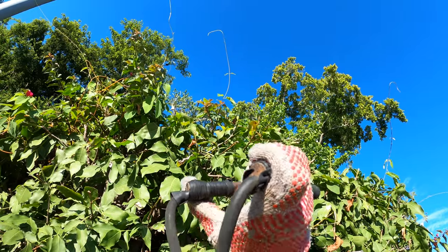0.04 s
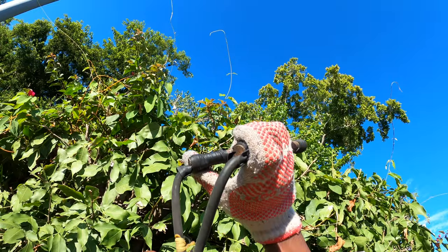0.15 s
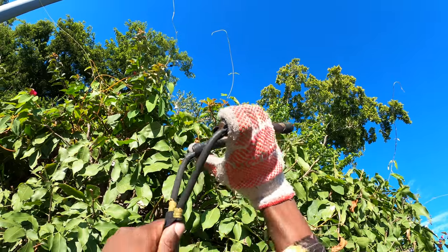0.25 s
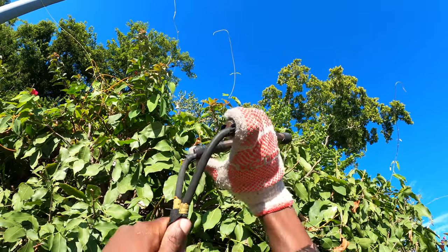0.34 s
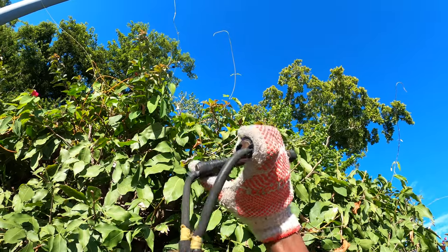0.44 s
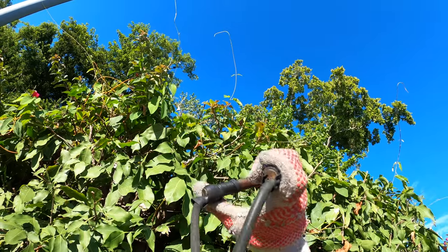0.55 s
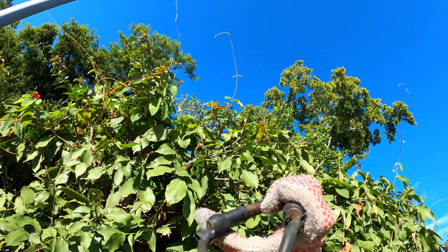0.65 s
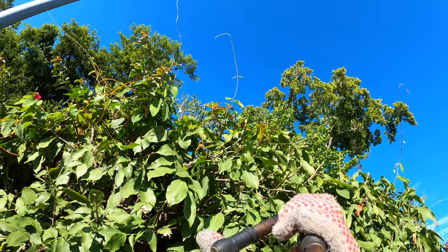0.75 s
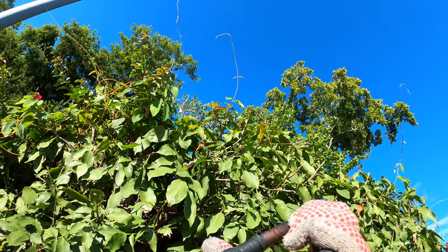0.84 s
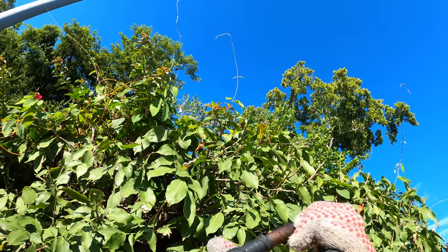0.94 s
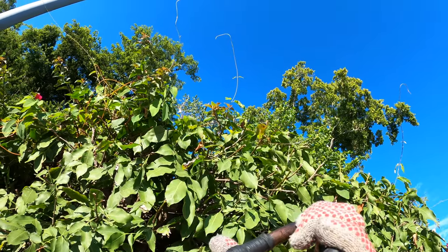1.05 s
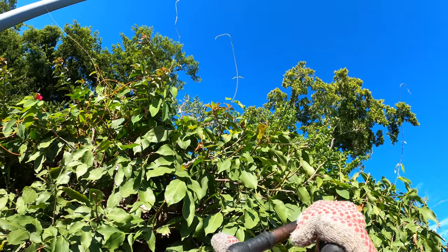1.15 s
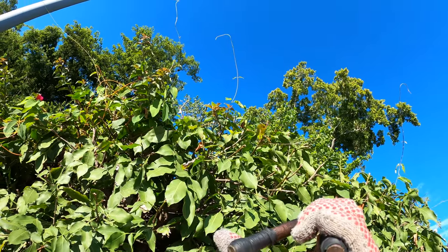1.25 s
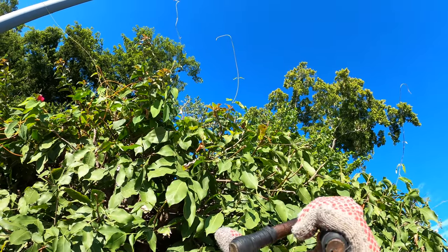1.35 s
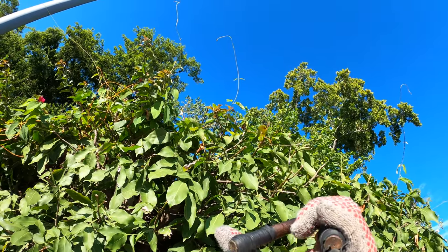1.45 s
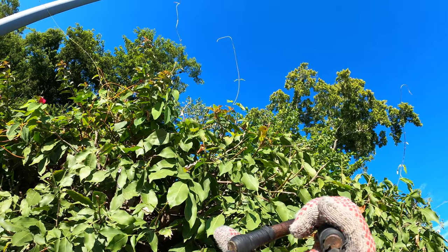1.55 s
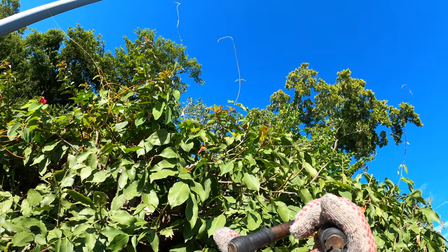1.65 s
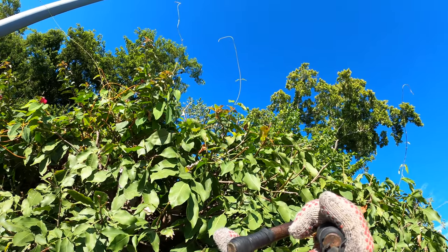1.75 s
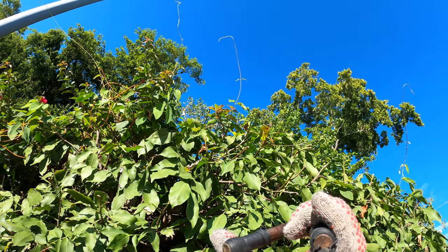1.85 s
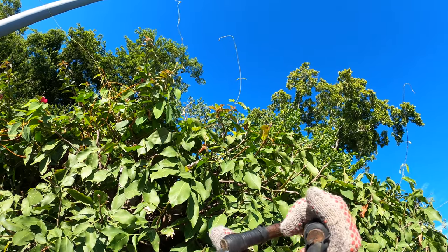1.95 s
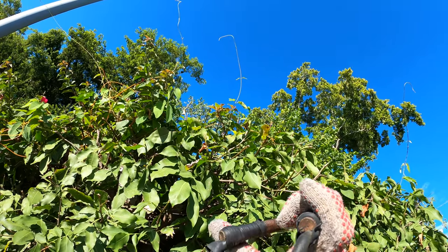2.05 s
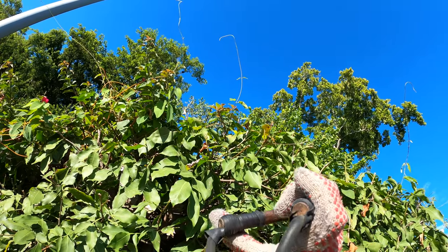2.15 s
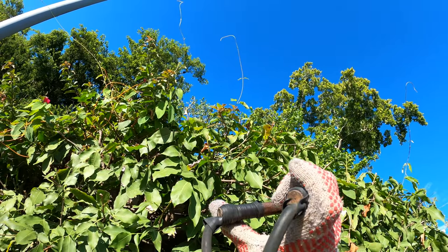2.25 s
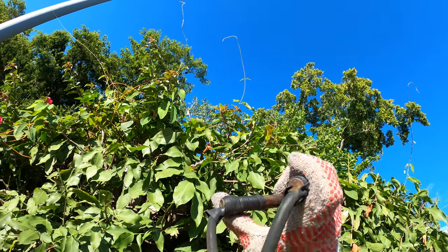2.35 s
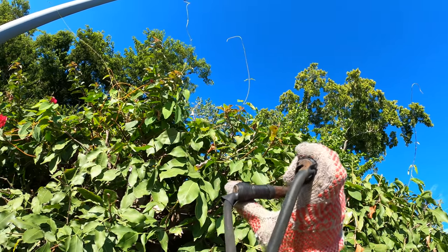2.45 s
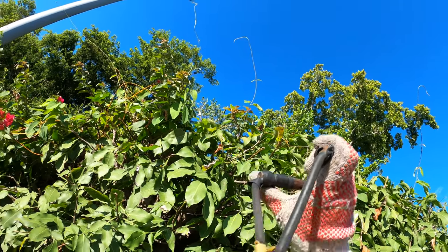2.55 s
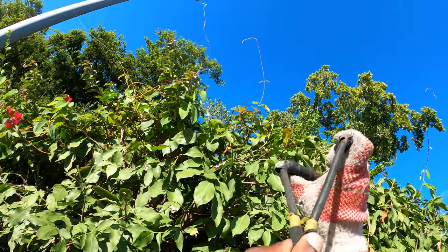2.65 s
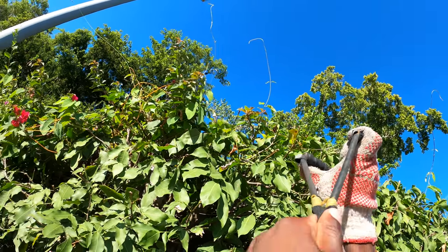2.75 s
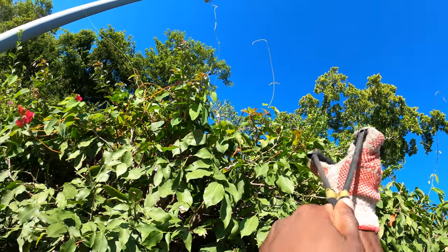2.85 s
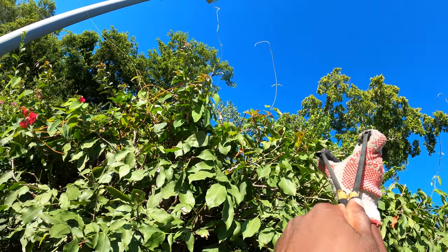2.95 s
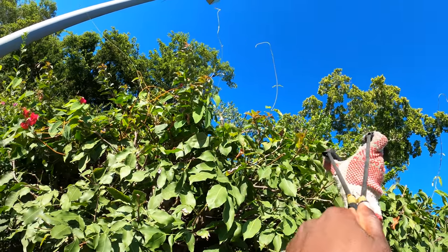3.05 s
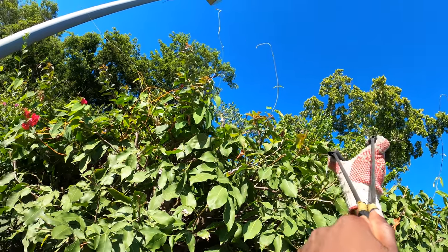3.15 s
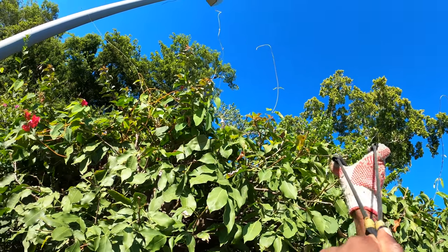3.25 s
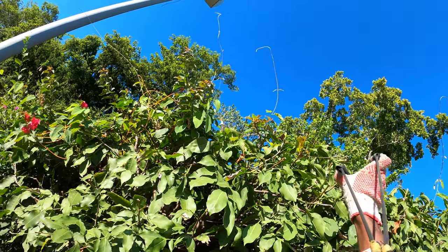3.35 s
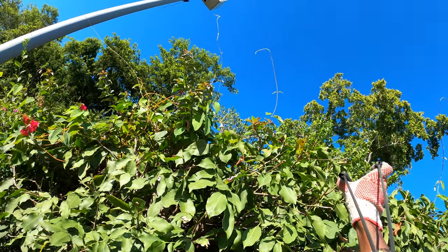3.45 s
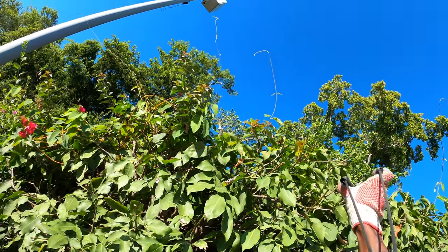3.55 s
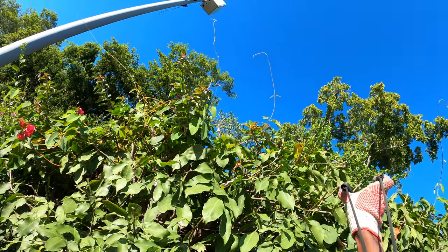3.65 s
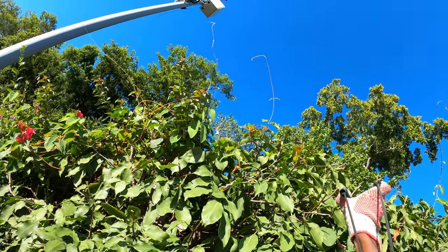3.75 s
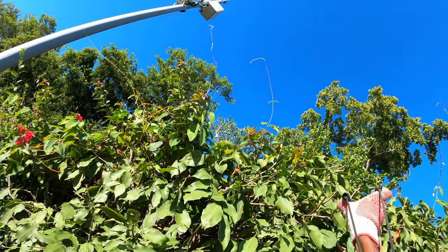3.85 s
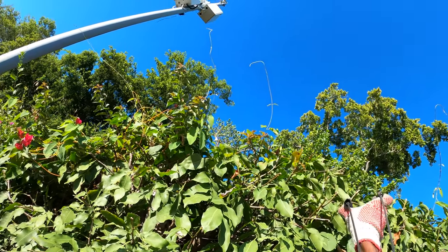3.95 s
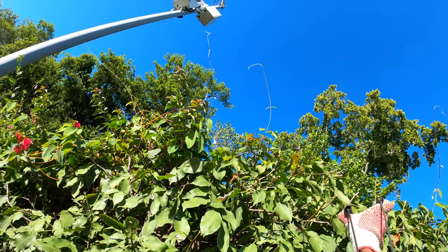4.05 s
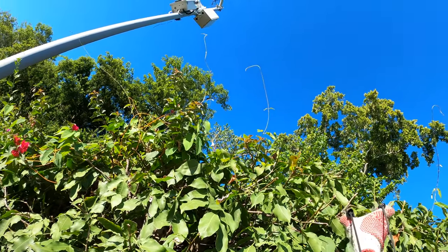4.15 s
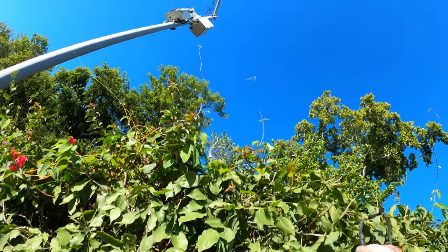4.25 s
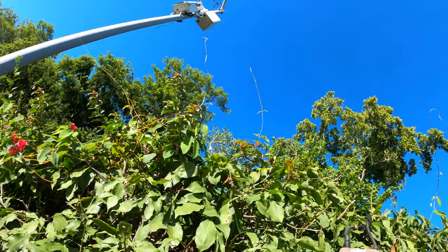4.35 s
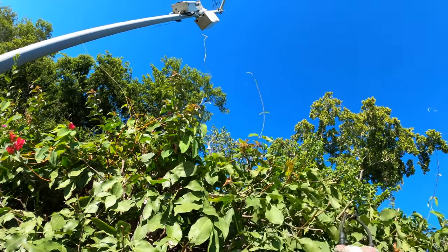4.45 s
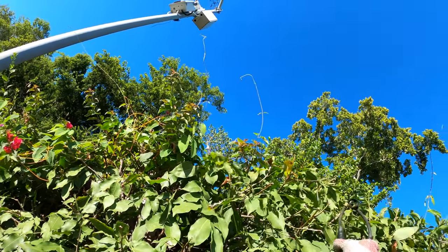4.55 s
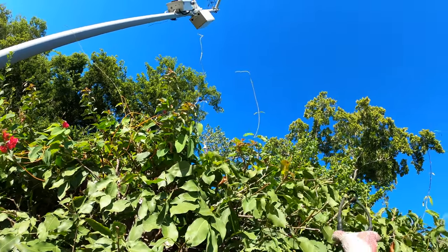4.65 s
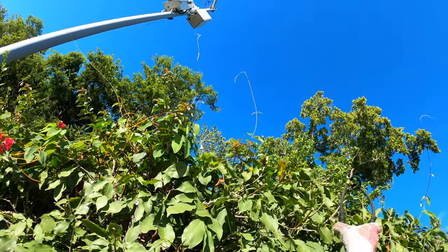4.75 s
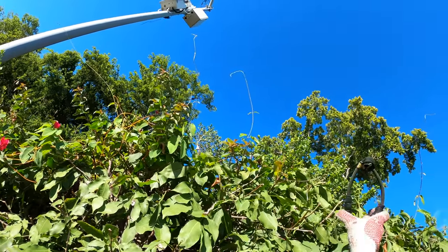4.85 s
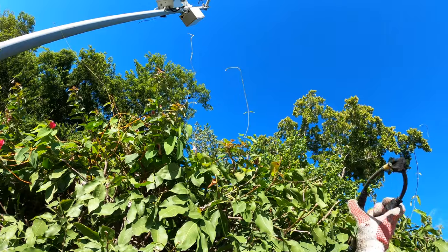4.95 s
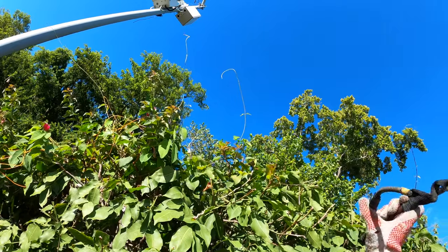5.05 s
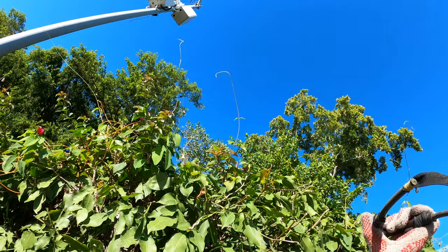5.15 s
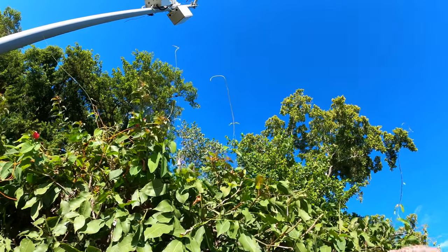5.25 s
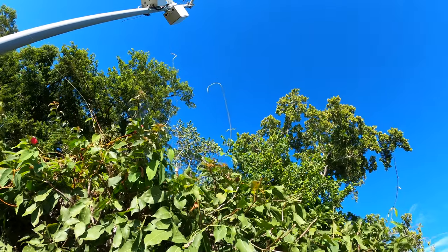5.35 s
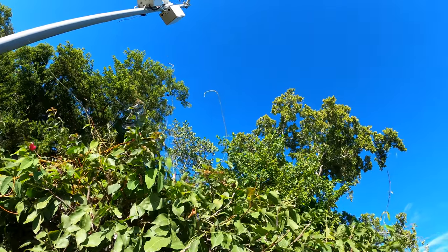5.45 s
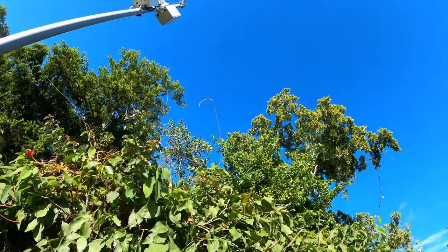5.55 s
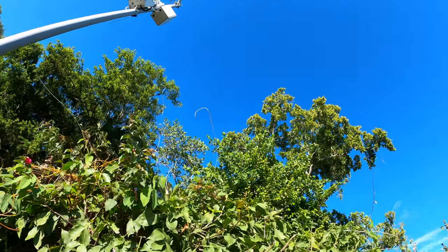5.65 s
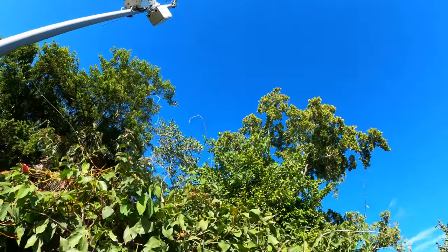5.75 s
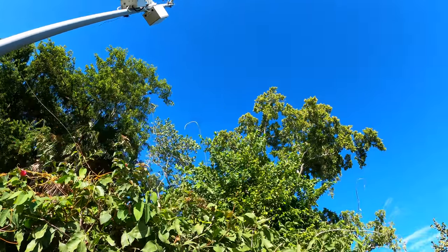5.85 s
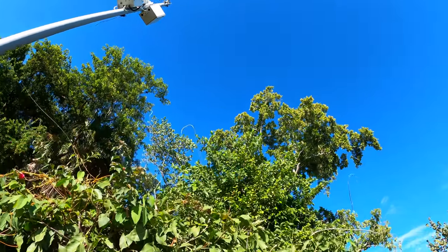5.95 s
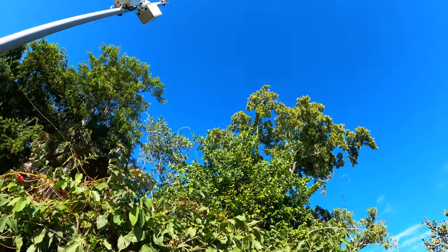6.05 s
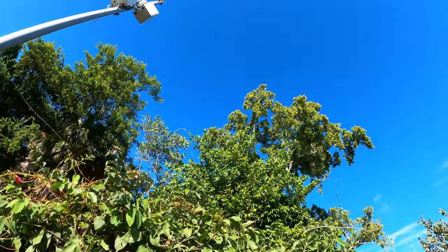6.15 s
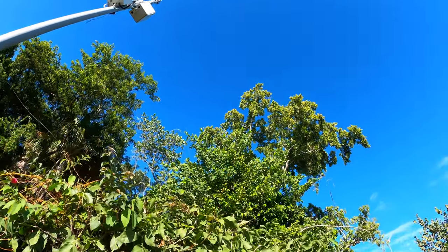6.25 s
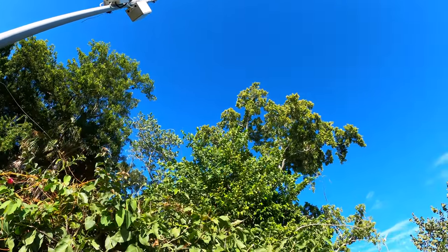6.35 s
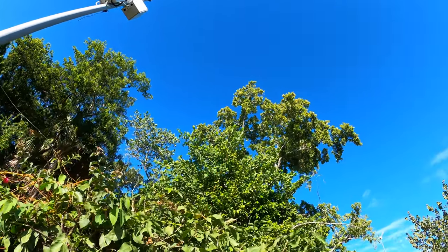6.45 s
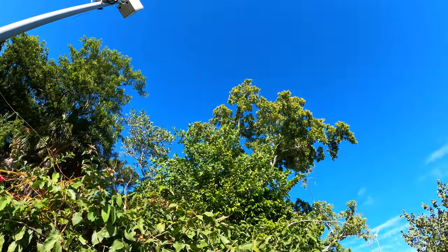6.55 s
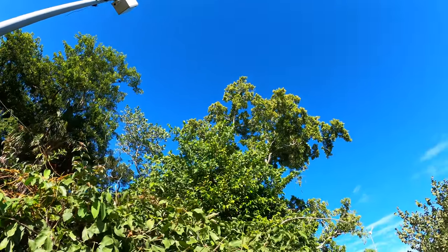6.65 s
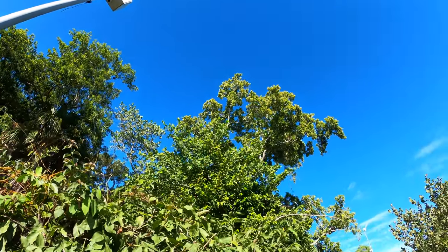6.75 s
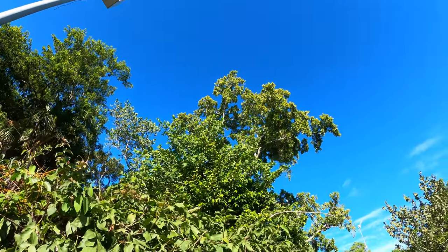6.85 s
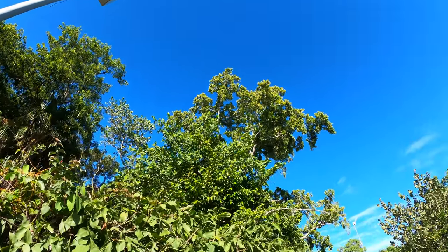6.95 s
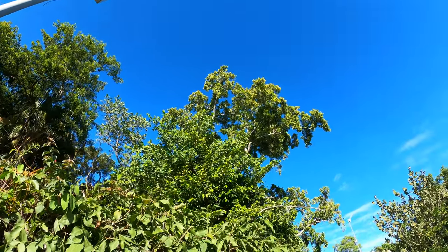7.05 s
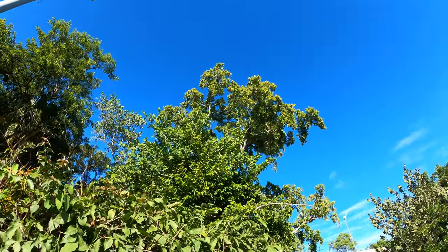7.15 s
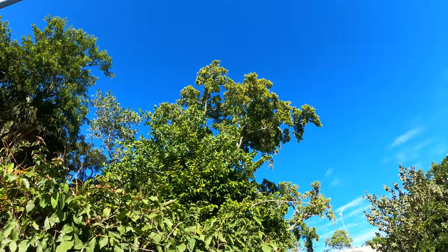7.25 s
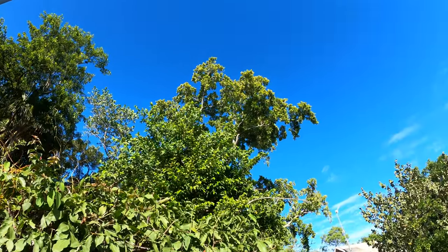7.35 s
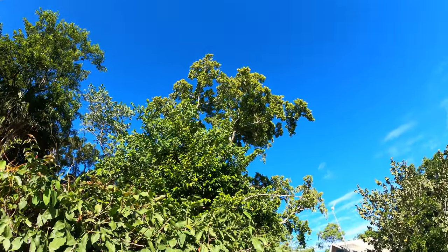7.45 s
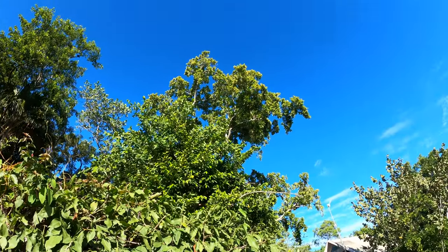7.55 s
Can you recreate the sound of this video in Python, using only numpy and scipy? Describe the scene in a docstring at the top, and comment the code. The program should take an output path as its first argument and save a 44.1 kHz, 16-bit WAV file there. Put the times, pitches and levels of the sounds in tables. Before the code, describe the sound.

A quiet, airy garden with faint bird warbles and soft dove coos. A glove rustles close by, then stretched rubber creaks in quick dry clicks that rise in pitch. After a short hold, the slingshot fires with a swish, a very loud sharp slap and a low jolt of the body-mounted microphone. Ticks and crisp leafy rustles follow, then a near reedy bird and a short hollow wind whistle.

```python
"""Slingshot in a garden

A gloved hand close to the camera draws and fires a rubber slingshot: grainy noise makes the cloth
rustle, clicks that ring make the bands creak slip by slip, noise puffs slap the fork and damped sines jolt
the camera. Birds and doves, trembling sines, call from the trees; noise through cavity resonances makes
the wind, whose gust whistles over the microphone ports near the end."""
import sys
import numpy as np
from scipy import signal
from scipy.fft import next_fast_len
from scipy.io import wavfile
from scipy.ndimage import uniform_filter1d

SR = 44100
rng = np.random.default_rng(int(sys.argv[2]) if len(sys.argv) > 2 else 0)


def unload_audio(sound):
    """Save the sound as a 16-bit wav file, at the path given as the first command line argument."""
    columns = np.transpose(np.atleast_2d(sound))
    # keep every value between -1 and 1, then stretch to whole-number steps
    steps = np.round(np.clip(columns, -1, 1) * 32767)
    wavfile.write(sys.argv[1], SR, steps.astype(np.int16))


N = 335292  # length in samples

# Garden air, spectrum before scaling: f/Hz, density level/dB per Hz
AIR_SPECTRUM = [(15, -27.5), (25, -17), (102, -1), (185, 3.5), (326, -4), (489, -10.5), (887, -21),
                (1230, -12), (1890, -26.5), (6380, -41), (9320, -39), (11000, -58.5), (16000, -62.5)]
# Likeness of the left and right ports in diffuse noise: f/Hz, likeness [0-1]
PORT_LIKENESS = [(60, 0.97), (180, 0.98), (550, 0.98), (1650, 1), (4970, 0.93), (15000, 0.25)]
# Cloth noise, spectrum before its dull and bright parts are split: f/Hz, density level/dB per Hz
CLOTH_SPECTRUM = [(290, -32.5), (500, -1), (621, -4), (1670, 1), (2290, -2), (2890, -0.5), (4090, -1.5),
                  (7000, -6), (10700, -24), (14900, -35.5), (16000, -34.5)]
# Fixed cavity modes of the microphone ports: f/Hz, width of each of two passes/Hz, relative level/dB
PORT_MODES = [(390, 90, 0), (1100, 500, -14), (290, 80, -4), (170, 100, -6)]
# Wind on the ports: t/s, push level/dB, cavity mode level/dB, upper whistle level/dB
WIND_LEVELS = [(0, -76, -90, -99), (.12, -71, -71.5, -70), (.33, -63, -59, -80), (.5, -72, -71, -78),
               (1.4, -68, -71, -73), (2.1, -76, -68, -76), (2.5, -69, -71.5, -77), (3.85, -69, -76, -88),
               (4.25, -54, -77, -88), (4.8, -72, -80, -88), (5.2, -64, -82, -89), (5.5, -70, -83, -89),
               (5.65, -64, -56.5, -66), (5.9, -60, -60, -74), (6.07, -68, -63, -72), (6.2, -65, -55, -59),
               (6.33, -62, -53, -55), (6.48, -67, -53, -50.5), (6.53, -60, -45.5, -42),
               (6.66, -50, -44, -34), (6.695, -53, -45, -55), (6.73, -58, -68, -76), (6.85, -67, -80, -95),
               (7.6, -85, -68.5, -84)]
# Strokes of glove, cloth and leaves, and the rasp at the start of the near bird's calls: peak t/s, hold/s,
# rise/s per 20 dB, fall/s per 20 dB, level/dB, dull part over it/dB, left minus right/dB
RUSTLE_STROKES = [(.12, .1, .2, .2, -69, 18, 0), (.21, .07, .16, .3, -59.5, 7, 0),
                  (.34, .05, .1, .04, -67, 11, 0), (1.42, .01, .15, .25, -75, 18, 0),
                  (2.4, .01, .2, .2, -77, 12, -2), (2.82, .1, .22, .55, -62, 9, 2),
                  (3.3, .4, .6, .5, -65, -2, 5), (4.03, .22, .07, .3, -61, 1.5, 5),
                  (4.2, .08, .15, .1, -66, 13, 4), (4.54, .02, .3, .4, -52, -5, 1),
                  (4.78, .07, .3, .3, -55, -3, 5), (5.04, .06, .15, .35, -54, -6, 1),
                  (5.32, .01, .08, .1, -63, -6, 1), (5.45, .01, .14, .13, -54.5, -7, -2),
                  (5.88, .01, .12, .07, -62, 0.5, 5), (5.72, .06, .15, .15, -72, -4, 5),
                  (6.2, .02, .05, .15, -67, 6, 12), (6.39, .01, .04, .17, -57, 3, 9),
                  (6.62, .04, .35, .12, -61, 17, 5), (6.68, .07, .05, .4, -62, -1.5, 8)]
# Swish of the bands: t/s, level/dB
BAND_SWISH = [(4.27, -78.5), (4.29, -39.5), (4.299, -26.5), (4.31, -22), (4.338, -31), (4.35, -48.5),
              (4.41, -45.5), (4.5, -49.5), (4.6, -61)]
# Far warbled notes, before band-pass and pan: t/s, length/s, first f/Hz, middle f/Hz, last f/Hz, level/dB
FAR_NOTES = [(0, .03, 3400, 3100, 3050, -68), (.035, .06, 3450, 3350, 3200, -69),
             (.535, .045, 3780, 3550, 3380, -69), (.58, .05, 3350, 3520, 3590, -62),
             (.69, .035, 3170, 2500, 2230, -73), (.76, .04, 2330, 3150, 3250, -68),
             (.797, .06, 2980, 2850, 2800, -58.5), (.95, .028, 4150, 4550, 4900, -68),
             (.992, .03, 4900, 4250, 4000, -68), (1.11, .04, 3670, 3950, 4000, -71),
             (1.148, .022, 4200, 4550, 4100, -70), (1.17, .03, 4030, 4000, 4000, -72),
             (1.28, .13, 3620, 3550, 3380, -65), (1.455, .028, 4260, 4600, 4870, -68),
             (1.495, .035, 4800, 4150, 3920, -71), (1.62, .125, 3430, 3460, 3500, -65),
             (1.75, .04, 3650, 3890, 3930, -63), (1.96, .09, 3500, 3430, 3550, -67),
             (2.06, .035, 3750, 3850, 3950, -68), (2.095, .022, 4400, 4750, 5050, -72),
             (2.125, .03, 4800, 4100, 3780, -72), (2.25, .13, 3560, 3450, 3450, -64),
             (2.42, .028, 4580, 4570, 4550, -74), (2.45, .025, 4250, 4200, 4150, -72),
             (2.79, .05, 3910, 3500, 2790, -63), (3.27, .06, 3740, 3750, 2720, -57),
             (6.98, .08, 3680, 3600, 2950, -68), (7.06, .07, 5050, 4900, 4690, -76)]
# Near bird's short slurs, before band-pass and pan: t/s, length/s, first f/Hz, middle f/Hz, last f/Hz,
# level/dB
NEAR_SLURS = [(6.25, .035, 1576, 1400, 1050, -55), (6.405, .03, 1360, 1350, 1290, -53),
              (6.465, .02, 1295, 1130, 960, -56), (6.705, .035, 1515, 1700, 1680, -50),
              (6.755, .022, 1556, 1400, 1205, -55)]
# Near bird's calls, a flick up, a slide down and a held note, before band-pass and pan: t/s, length/s,
# top f/Hz, held f/Hz, slide level/dB, held level/dB, level change by the end/dB
NEAR_CALLS = [(6.172, .11, 2327, 1712, -56, -45.5, -15), (6.375, .095, 1395, 900, -50, -55, -3),
              (6.67, .09, 1660, 890, -43, -53, -7)]
# Harsh two-voiced chips, before band-pass and pan: t/s, length/s, starting level of each voice/dB
HARSH_CHIPS = [(3.462, .034, -47), (3.576, .037, -46)]
# Low moans of moving air: t/s, length/s, f/Hz, level/dB
AIR_MOANS = [(.12, 0.51, 306, -61.5), (2.05, 0.18, 290, -61), (2.35, 0.11, 290, -63.5),
             (7.3, 0.37, 280, -66.5)]
# Thin buzzes high up: t/s, length/s, f/Hz, level/dB
HIGH_BUZZES = [(.48, .05, 7540, -81), (.7, .13, 7400, -74), (1.049, .05, 7600, -75),
               (1.698, 0.18, 7200, -78.5), (2.595, .15, 6500, -82), (3.198, 0.19, 7050, -69.5)]
# Small ticks of pouch, twigs and strap, and two last slips of the creaking bands: t/s,
# peak level before pan/dB, centre f/Hz, left minus right/dB
SMALL_TICKS = [(0.634, -49.5, 3430, 0.0), (1.4104, -50.5, 1470, 0.5), (2.04, -55, 1280, 1.0),
               (2.0734, -47.5, 4050, 5), (2.3094, -55, 4400, 1), (2.3992, -48.5, 3720, 4),
               (3.6714, -50, 5000, 3), (3.7054, -55, 5500, 3), (4.0644, -49, 1330, 10),
               (4.072, -47, 1230, 14), (4.4788, -33, 1720, 0.5), (4.5453, -26, 4670, 7),
               (4.615, -41, 2430, 9), (4.683, -43, 1310, -3), (4.776, -37, 1310, -8),
               (4.8653, -39, 5850, -2), (4.8887, -27, 7140, 6.5), (4.9994, -32.5, 5500, 2),
               (5.1193, -36.5, 3660, 9), (5.3112, -39.5, 5470, 1), (5.376, -52, 1430, 4.0),
               (5.4023, -39.5, 3500, 6), (5.4287, -36, 4040, 1), (5.4431, -31.5, 3400, 7),
               (5.462, -40, 1620, 8), (5.4868, -34.5, 3670, 4.0), (5.5139, -45.5, 4250, 4),
               (5.6737, -49.5, 4220, 0), (5.8747, -51, 1760, 10), (5.981, -56, 7000, 3),
               (6.014, -56, 6500, 3), (6.122, -52, 7000, 3.0), (6.4164, -44, 7500, 5),
               (6.5925, -42, 1200, 4.0), (6.8102, -36, 2030, 5.5), (6.8577, -44.5, 2170, 6),
               (7.1794, -53.5, 3270, -0.5)]
# Dove coos, pitch arching up and sagging: t/s, length/s, top f/Hz, level/dB
DOVE_COOS = [(.67, .14, 524, -61.5), (.96, 0.36, 536.4, -57.5), (1.71, 0.097, 528, -57.5),
             (3.3, 0.15, 504, -69), (3.48, 0.11, 499, -66), (3.86, 0.44, 513, -65.5),
             (5.3, 0.125, 503, -67), (5.7, 0.26, 500, -62.5), (6.98, 0.21, 495, -66.5)]
# The draw, one slip of rubber on the fork for every step of stretch: t/s, steps so far
DRAW_STEPS = [(2.825, 0), (2.9058, 4), (2.9711, 8), (3.0521, 12), (3.0686, 13), (3.1228, 17), (3.187, 20),
              (3.264, 25), (3.288, 26), (3.348, 30), (3.3615, 31), (3.3948, 32), (3.4622, 35), (3.561, 39)]
# The band tightens: t/s, slip level/dB, low ring over the slip/dB, high ring over the slip/dB
STRETCH_LEVELS = [(2.8, -37.5, -14, .3), (3.0, -40, -4, 2.5), (3.115, -42, -4, 2.5), (3.14, -41, -20, 3),
                  (3.33, -42, -8, 3), (3.36, -46, -6, -4), (3.6, -47, -20, -5)]
# Fork, low ring and high ring, in that order: f at the first slip/Hz, climb/Hz per s
RING_PITCHES = [(2800, 1300), (1080, 700), (6300, 1600)]
# Bands and pouch slap the fork: t/s, peak level before pan/dB, centre f/Hz, t60/s, width as a share of f
FORK_SLAPS = [(4.3009, -7, 1700, 0.011, 0.41), (4.3060, -13, 4335, .015, 0.24),
              (4.3110, -1.5, 4300, 0.0088, 0.74), (4.3118, -10, 600, .03, .8),
              (4.3191, -5, 2800, 0.0055, 0.98), (4.3274, -21, 2190, 0.014, .6),
              (4.329, -28, 3530, .08, 0.95)]
# Camera mount modes: f/Hz, relative level/dB, t60/s
MOUNT_MODES = [(32, 0.5, 0.097), (56.6, 0.5, 0.024), (194.7, 0, 0.066), (295, -14, 0.07)]
# Recoil throws the camera to and fro: t/s, level/dB, direction [+1 or -1], time the push takes/s
RECOIL_JOLTS = [(4.3035, -10, -1, 0.0018), (4.3075, -7.5, 1, 0.0034), (4.3140, -16.5, 1, .001),
                (4.3170, -10.5, -1, 0.0022), (4.341, -27, 1, .006), (4.442, -30, -1, 0.0076),
                (4.456, -29, 1, .008)]
# Short level pips: t/s, length/s, f/Hz, level before pan/dB
LEVEL_PIPS = [(5.909, 0.048, 2168, -71), (6.747, 0.037, 2290, -59), (6.849, 0.015, 2150, -63),
              (6.874, .02, 2210, -58.5), (6.969, 0.023, 2140, -64), (7.087, 0.048, 2143, -64.5),
              (7.222, .06, 2180, -72.5), (7.349, 0.059, 2120, -66), (7.498, 0.024, 2156, -66.5)]

AIR_DB = -64
SHOT_S = 4.31
WHISTLE_HZ, WHISTLE_BENDS_DB, WHISTLE_HZ_PER_DB = 665, -46, 5.5  # blown hard, the whistle goes sharp
# Cloth at rest; the leaves stay stirred after the shot. Pans are left minus right
IDLE_DB, IDLE_DULL_DB = -86, 13
IDLE_AFTER_DB, IDLE_AFTER_DULL_DB, IDLE_AFTER_PAN_DB = -78, 7., 5.
CATCHES_PER_S, CATCH_DB = 40, -1.5  # single twigs snap once the shot has stirred the leaves
BUZZY_FROM_S, ROUGH_SHORT, ROUGH_LONG = .075, .15, .48  # long far notes are buzzy, short ones clear
FLICK_S, SLIDE_S, FLICK_FROM = .012, .023, .78  # the flick starts at this share of the top pitch
BRIGHT_SLIDE, BRIGHT_HELD = .7, .93  # brightness 0-1 shifts weight to the even partials
CHIP_LOW_HZ, CHIP_HIGH_HZ = 4180, 5480
CHIP_DROP, CHIP_FADE_DB = (.5, .18), (-9, -4)  # low, high voice: share of pitch lost, level change
FAR_PAN_DB, NEAR_PAN_DB, CHIP_PAN_DB = .8, 9., 4.  # left minus right
SLIP_JITTER_S, SLIP_SCATTER_DB, RING_SCATTER = .0004, 1.2, .12
LOW_TOP_HZ, HIGH_TOP_HZ = 1280, 7200  # the rings climb no further
SWAY_S, SWAY_DB, SWAY_HOLD_S, SWAY_T60_S = 4.35, -38, .1, .5  # the mount sways after the shot
PORT_LAG = .07  # radians by which each port leads or lags on the jolts
EDGE_HZ = 16400  # upper band limit


def gain_of(db):
    """Decibels to amplitude gain."""
    return 10 ** (np.asarray(db) / 20)


def evened(x):
    """Scales to rms 1."""
    return x / np.sqrt(np.mean(x ** 2) + 1e-20)


def read(points, hz):
    """Reads a spectrum on a log-frequency axis."""
    f, value = np.transpose(points)
    return np.interp(np.log(hz + 1), np.log(f + 1), value)


def columns(rows):
    """Joins table rows by straight lines over the whole length."""
    s, *rest = np.transpose(rows)
    return [np.interp(np.arange(N) / SR, s, column) for column in rest]


def panned(x, pan_db):
    """Splits a level difference evenly between left and right."""
    side_db = np.multiply.outer([.5, -.5], pan_db * np.ones(np.shape(x)[-1]))
    return x * gain_of(side_db)


def add(mix, s, sound):
    """Mixes a sound in at time s."""
    part = mix[..., round(s * SR):][..., :sound.shape[-1]]
    part += sound[..., :part.shape[-1]]


def resonate(x, hz, width):
    """Resonance of gain 1: shifts the curve hz down to zero, smooths, and shifts back."""
    turn = np.exp(2j * np.pi * np.cumsum(hz * np.ones(x.shape[-1])) / SR)
    r = np.exp(-np.pi * abs(width) / SR)
    return 2 * (turn * signal.lfilter([1 - r], [1, -r], x / turn)).real


def band(x, lo_hz, hi_hz):
    """Band-pass by a Butterworth filter."""
    edges = [lo_hz, min(hi_hz, .49 * SR)]
    return signal.sosfilt(signal.butter(2, edges, "bandpass", fs=SR, output="sos"), x)


def swell(s, hold, rise, fall):
    """Gain of an event that rises to s, holds and falls, rise and fall in seconds per 20 dB."""
    t = np.arange(N) / SR - s
    return gain_of(20 * np.minimum(np.minimum(t / rise, (hold - t) / fall), 0))


def noise(spectrum, patchy_db, alike):
    """Stereo noise of rms 1 with a given spectrum, its level drifting in patches of time and pitch."""
    frames, hz = N // 256 + 5, np.fft.rfftfreq(1024, 1 / SR)
    a, b, c, d, patches = rng.standard_normal((frames, 513, 5)).T
    patches = uniform_filter1d(patches, size=12, axis=0)  # across frequency
    patches = evened(uniform_filter1d(patches, size=10, axis=1))  # across time
    same = np.clip(alike * read(PORT_LIKENESS, hz), -1, 1)[:, None]
    left, other = a + 1j * b, c + 1j * d
    z = np.array([left, same * left + np.sqrt(1 - same ** 2) * other])
    z *= gain_of(read(spectrum, hz)[:, None] + patchy_db * patches)
    return evened(signal.istft(z, nperseg=1024, noverlap=768)[1][:, :N])


def burst(db, hz, t60, spread):
    """A dying puff of noise round one frequency; the treble reaches the two ports unlike."""
    t = np.arange(4000) / SR
    left, other = rng.standard_normal((2, 4000))
    puff = np.array([left, left + band(other - left, 2700, 28000)])
    puff = puff * gain_of(-60 * t / max(t60, .003))
    puff = resonate(puff, hz, spread * hz) + 0.02 * puff
    puff = band(band(puff, 150, 8500), 150, 9500)  # the housing shades the top octave
    return gain_of(db) * puff / abs(puff).max()


def sung(rows, voice):
    """Start and sound of one call: a voice follows the row columns over their span, with soft ends."""
    s, *rest = np.transpose(rows)
    t = np.arange(s[0], s[-1], 1 / SR)
    sound = voice(*(np.interp(t, s, column) for column in rest))
    return s[0], sound * signal.windows.tukey(len(t), .25)


def bent(s, length, first_hz, middle_hz, last_hz, db):
    """Rows of a note whose pitch bends smoothly through three values, loudest in its middle."""
    u = np.linspace(-1, 1, 9)
    slope = .5 * (last_hz - first_hz)
    curve = .5 * (first_hz + last_hz) - middle_hz
    hz = middle_hz + slope * u + curve * u ** 2
    return np.transpose([s + .5 * length * (u + 1), hz, db - 8. * u ** 2])


def tone(hz, rough):
    """A sine of about rms 1 whose size and pitch tremble."""
    tremble = rng.standard_normal((2, SR))[:, :len(hz)]
    size, pitch = (evened(uniform_filter1d(uniform_filter1d(v, size=80), size=80)) for v in tremble)
    phase = 2 * np.pi * np.cumsum(hz * (1 + .06 * rough * pitch)) / SR
    return np.sqrt(2) * (1 + rough * size) * np.sin(phase)


def reedy(hz, db, bright=.88):
    """The near bird's voice: the second partial leads; the odd ones fade as it brightens."""
    odd = tone(hz, 0.5) + .9 * tone(3 * hz, 0.45)
    even = tone(2 * hz, 0.33) + 0.12 * tone(4 * hz, .3)
    return gain_of(db) * ((1 - bright) * odd + bright * even)


def air():
    """Steady wash of the garden all round: patchy noise, nearly alike at both ports."""
    return gain_of(AIR_DB) * noise(AIR_SPECTRUM, 1.7, 0.95)


def wind():
    """Lumpy pressure on the ports, and turbulence that blows their cavity modes."""
    push_db, gust_db, upper_db = columns(WIND_LEVELS)
    upper_hz = WHISTLE_HZ + WHISTLE_HZ_PER_DB * np.maximum(upper_db - WHISTLE_BENDS_DB, 0)
    push, gust = rng.standard_normal((2, N))
    lumps = gain_of(1.3 * evened(band(rng.standard_normal(N), 12, 60)))
    slow_lumps = gain_of(3.5 * evened(band(rng.standard_normal(N), 1.5, 9)))
    pressure = slow_lumps * evened(band(push, 28, 88))
    modes = evened(sum(gain_of(db) * evened(resonate(resonate(gust, hz, width), hz, width))
                       for hz, width, db in PORT_MODES))
    whistle = evened(resonate(resonate(gust, upper_hz, 140), upper_hz, 140))
    blown = gain_of(push_db) * pressure + gain_of(gust_db) * modes + gain_of(upper_db) * whistle
    return blown * evened(lumps)


def rustle():
    """Noise broken into grains, as fibres catch; band swish and the near bird's rasp share its colour."""
    grain = gain_of(1.9 * evened(uniform_filter1d(rng.standard_normal(N), size=200)))
    t = np.arange(N) / SR - SHOT_S
    after = t > 0
    snaps = (rng.random(N) < CATCHES_PER_S / SR) * rng.exponential(1, N) * after
    grain = grain + gain_of(CATCH_DB) * signal.lfilter([1], [1, -.985], snaps)
    cloth = evened(noise(CLOTH_SPECTRUM, 2.5, 0.83) * grain)
    dull = band(cloth, 500, 1900)
    bright = band(cloth - dull, 300, 12000)
    fizz = gain_of(9. - 9. * t ** 2) * after  # shaken leaves fizz on after the shot
    bright += band(cloth, 8300, 15000) * fizz

    # Strokes add to the idle cloth as powers
    power = panned(gain_of(np.where(after, IDLE_AFTER_DB, IDLE_DB)), IDLE_AFTER_PAN_DB * after) ** 2
    dull_power = power * gain_of(np.where(after, IDLE_AFTER_DULL_DB, IDLE_DULL_DB)) ** 2
    for s, hold, rise, fall, db, dull_db, pan_db in RUSTLE_STROKES:
        stroke = panned(gain_of(db) * swell(s, hold, rise, fall), pan_db) ** 2
        power = power + stroke
        dull_power = dull_power + stroke * gain_of(dull_db) ** 2
    swish = gain_of(columns(BAND_SWISH)[0]) * (np.arange(N) < 4.6 * SR) * cloth
    return np.sqrt(power) * bright + np.sqrt(dull_power) * dull + swish


def birds():
    """Trembling sines: far warbles, a reedy near call of four partials and harsh two-voiced chips."""
    far, near, chips = np.zeros((3, N))
    for row in FAR_NOTES:
        rough = ROUGH_LONG if row[1] > BUZZY_FROM_S else ROUGH_SHORT
        add(far, *sung(bent(*row), lambda hz, db: gain_of(db) * tone(hz, rough)))
    for row in NEAR_SLURS:
        add(near, *sung(bent(*row), reedy))
    for s, length, top_hz, held_hz, slide_db, held_db, change_db in NEAR_CALLS:
        top = s + FLICK_S
        down = top + SLIDE_S
        call = [(s, FLICK_FROM * top_hz, slide_db - 8, BRIGHT_SLIDE),
                (top, top_hz, slide_db, BRIGHT_SLIDE),
                (down, held_hz, held_db - 2.5, BRIGHT_HELD),
                (down + .018, held_hz, held_db, BRIGHT_HELD),
                (s + length, held_hz, held_db + change_db, BRIGHT_HELD)]
        add(near, *sung(call, reedy))

    def harsh(lo, hi, lo_db, hi_db):
        """Two rough sines at once."""
        return gain_of(lo_db) * tone(lo, .55) + gain_of(hi_db) * tone(hi, 0.5)

    u = np.linspace(0, 1, 9)
    low_hz = CHIP_LOW_HZ * (1 - CHIP_DROP[0] * u ** 2.5)
    high_hz = CHIP_HIGH_HZ * (1 - CHIP_DROP[1] * u ** 2.5)
    for s, length, db in HARSH_CHIPS:
        levels = [db + fade_db * u for fade_db in CHIP_FADE_DB]
        add(chips, *sung(np.transpose([s + length * u, low_hz, high_hz, *levels]), harsh))
    return panned(far, FAR_PAN_DB) + panned(near, NEAR_PAN_DB) + panned(chips, CHIP_PAN_DB)


def garden(x, t60, start):
    """Leaves and walls scatter sound back: sparse taps of random sign, partly shared by the ears."""
    taps = np.zeros((2, SR))
    at = np.arange(0, SR - 20, 20) + rng.integers(0, 20, (2, (SR - 1) // 20))
    np.put_along_axis(taps, at, rng.choice([-1., 1.], at.shape), 1)
    t = np.arange(SR) / SR
    taps = (taps + .5 * taps[::-1]) * gain_of(-60 * t / t60) * np.clip(t / start, 0, 1)
    return signal.fftconvolve(x[None], taps / np.linalg.norm(taps[0]), axes=1)[:, :N]


def noise_bands(rows, width, alike):
    """Moans or buzzes: narrow bands of noise that swell and fade, width a share of f to each side."""
    out = np.zeros((2, N))
    for s, length, hz, db in rows:
        hiss = rng.standard_normal((2, SR))[:, :round(length * SR)]
        left, other = band(hiss, (1 - width) * hz, (1 + width) * hz)
        pair = np.array([left, alike * left + (1 - alike) * other])
        add(out, s, gain_of(db) * evened(pair) * signal.windows.tukey(len(left), .6))
    return out


def ticks():
    """Short noise snaps, each with its own colour and side; high ones die sooner."""
    out = np.zeros((2, N))
    for s, db, hz, pan_db in SMALL_TICKS:
        add(out, s, panned(burst(db, hz, 0.014 + 30 / hz, 0.2 + 400 / hz), pan_db))
    return out


def doves():
    """Soft low coos: slightly rough sines on an arch of pitch."""
    out = np.zeros(N)
    for s, length, hz, db in DOVE_COOS:
        arch = [(s, .95 * hz, db - 0.5), (s + .3 * length, hz, db),
                (s + .7 * length, .97 * hz, db - 1.5), (s + length, .92 * hz, db - 2)]
        add(out, *sung(arch, lambda f, level_db: gain_of(level_db) * tone(f, 0.25)))
    return out


def creak():
    """Each slip is a click that rings the stretched band and the fork, higher as the draw goes on."""
    out = np.zeros((2, N))
    draw_s, steps = np.transpose(DRAW_STEPS)
    at, *stretch = np.transpose(STRETCH_LEVELS)
    for s in np.interp(np.arange(steps[-1] + 1), steps, draw_s):
        late, size, ring = rng.standard_normal(3)
        db, low_db, high_db = (np.interp(s, at, column) for column in stretch)
        fork_hz, low_hz, high_hz = (f + climb * (s - draw_s[0]) for f, climb in RING_PITCHES)
        db += SLIP_SCATTER_DB * size
        fork = burst(db, fork_hz * (1 + RING_SCATTER * np.tanh(ring)), 0.006, .3)
        high = burst(db + high_db, min(high_hz, HIGH_TOP_HZ), 0.007, 0.12)
        low = burst(db + low_db, min(low_hz, LOW_TOP_HZ), 0.013, 0.12)
        add(out, s + SLIP_JITTER_S * late, fork + high + low)
    return panned(out, 3.2)


def shot():
    """Slaps crack in the air; the recoil rings the mount's damped modes, and it then sways."""
    cracks, jolts, t = np.zeros((2, N)), np.zeros(N), np.arange(8000) / SR
    ring = sum(gain_of(db - 60 * t / t60) * np.sin(2 * np.pi * hz * t) for hz, db, t60 in MOUNT_MODES)
    for s, db, hz, t60, spread in FORK_SLAPS:
        add(cracks, s, burst(db, hz, t60, spread))
    for s, db, way, push_s in RECOIL_JOLTS:
        push = np.hanning(round(push_s * SR) + 3)  # a slow push leaves the high modes quiet
        add(jolts, s, way * gain_of(db) * np.convolve(ring, push / push.sum()))
    rumble = evened(band(rng.standard_normal(N), 18, 47))
    sway = rumble * gain_of(SWAY_DB) * swell(SWAY_S, SWAY_HOLD_S, .01, SWAY_T60_S / 3)
    return cracks, jolts + sway


def pips():
    """Short whistles of level pitch: rough sines."""
    out = np.zeros(N)
    for s, length, hz, db in LEVEL_PIPS:
        add(out, *sung([(s, hz), (s + length, hz)], lambda f: gain_of(db) * tone(f, 0.37)))
    return panned(out, 3.5)


def scene():
    """All sources, near and far, with the garden's echo on birds and shot."""
    song = band(birds(), 1200, 9000)  # keeps the birds' trembling tones within 1.2 to 9 kHz
    cracks, jolts = shot()
    quadrature = signal.hilbert(jolts, next_fast_len(N)).imag[:N]
    jolts = panned(jolts, -.3) + np.outer([PORT_LAG, -PORT_LAG], quadrature)
    near = rustle() + wind() + creak() + ticks() + panned(cracks, 1.6) + jolts
    heard = song.mean(axis=0)
    song_echo = gain_of(-5.5) * garden(heard, 0.75, .02) + gain_of(-9) * garden(heard, .14, .004)
    echoes = panned(song_echo, 3.) + gain_of(-18) * garden(cracks[0], .7, .02)
    far = gain_of(-.8) * song + doves() + pips()
    far = far + noise_bands(HIGH_BUZZES, 0.05, 0.74) + noise_bands(AIR_MOANS, 0.091, 1.0)
    return air() + near + far + echoes


def record(dry):
    """The loudest peaks round off in the preamplifier; then the band limit."""
    soft = dry / (1 + abs(dry / .95) ** 6) ** (1 / 6)
    low_pass = signal.firwin(511, EDGE_HZ, window=("kaiser", 9), fs=SR)
    return signal.oaconvolve(soft, low_pass[None], "same")


dry = scene()
out = record(dry)
unload_audio(out)
```